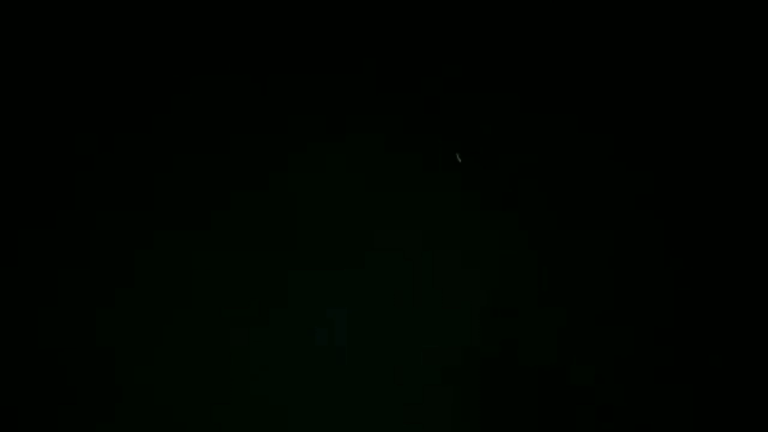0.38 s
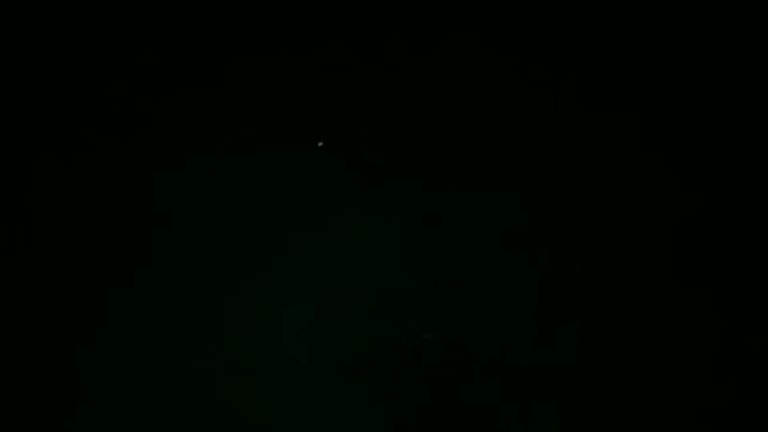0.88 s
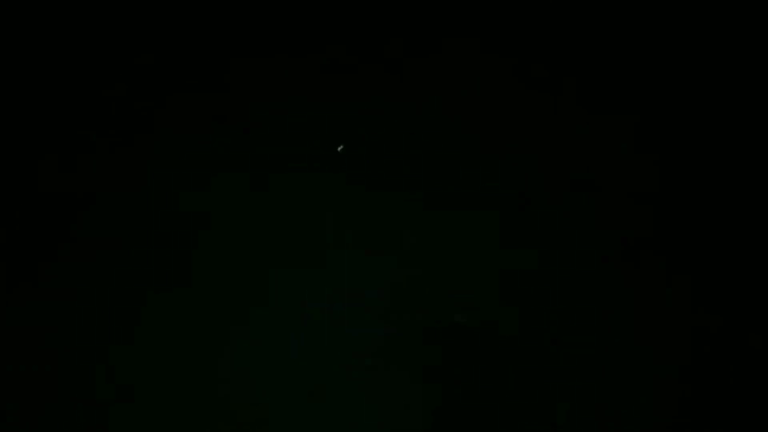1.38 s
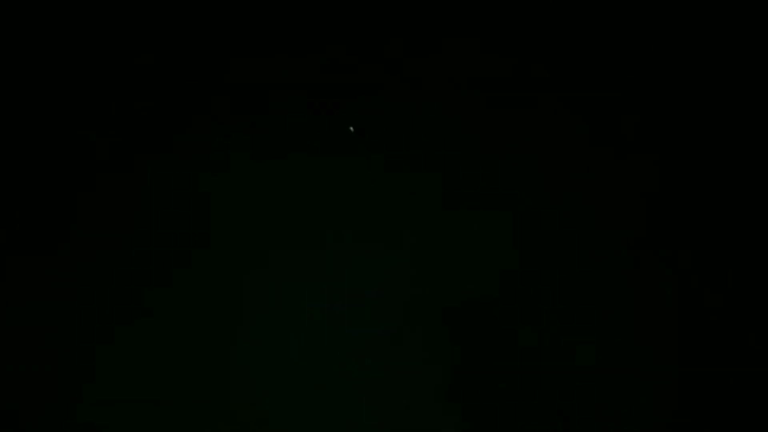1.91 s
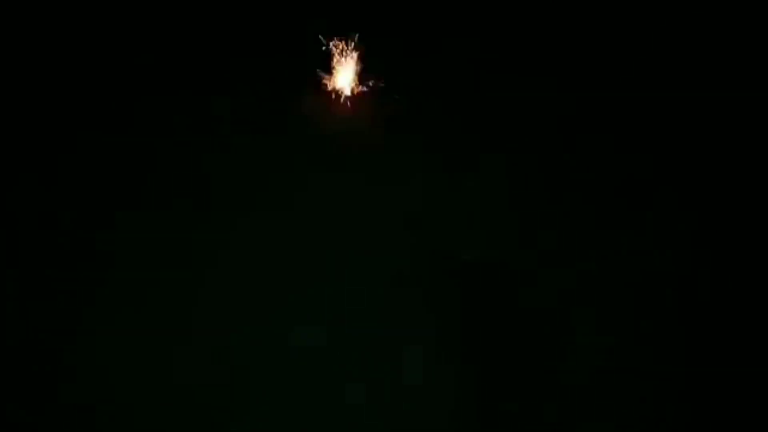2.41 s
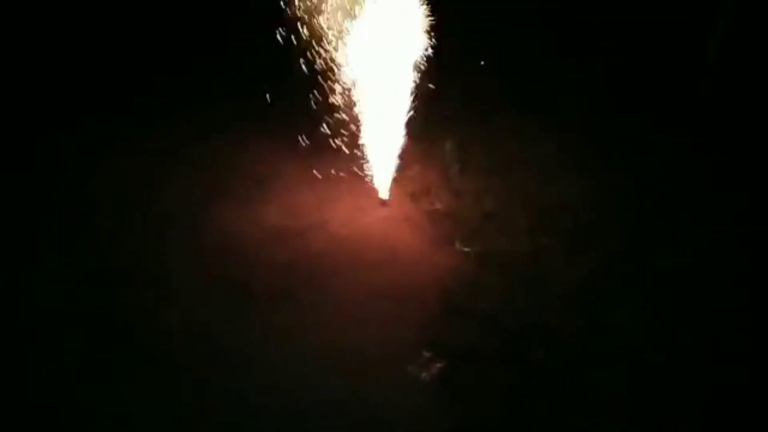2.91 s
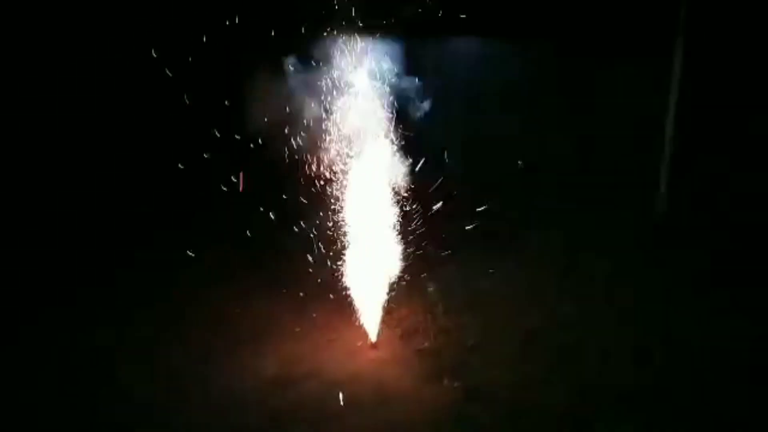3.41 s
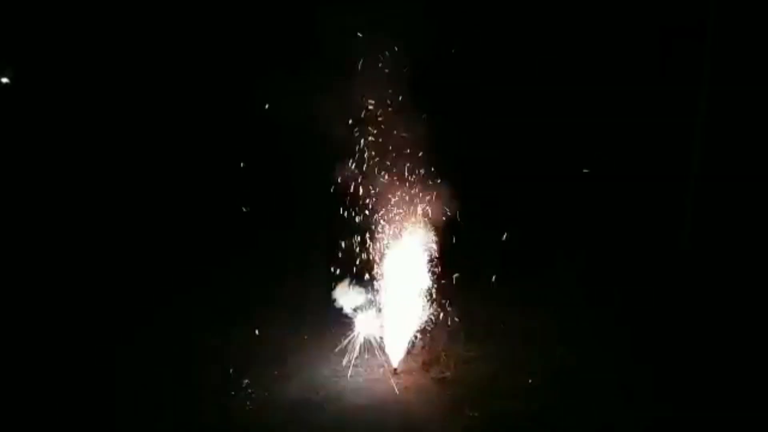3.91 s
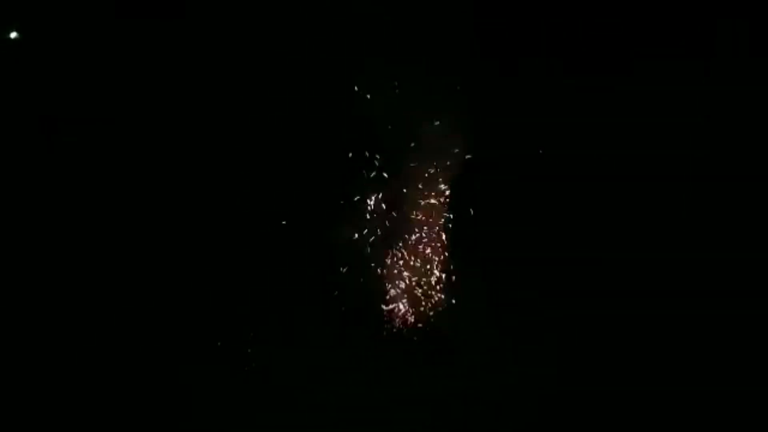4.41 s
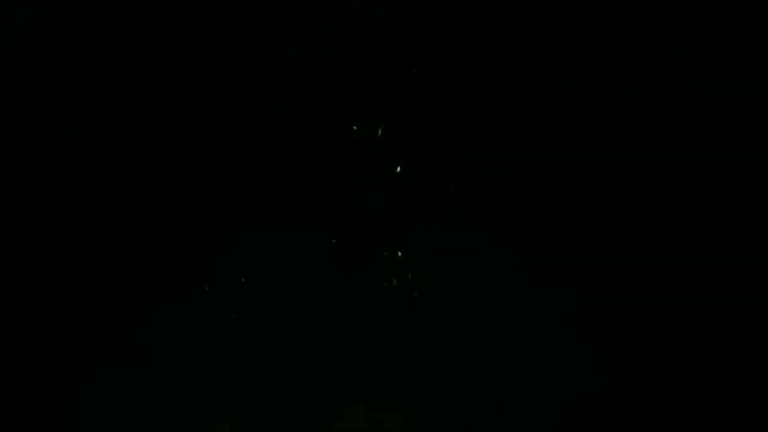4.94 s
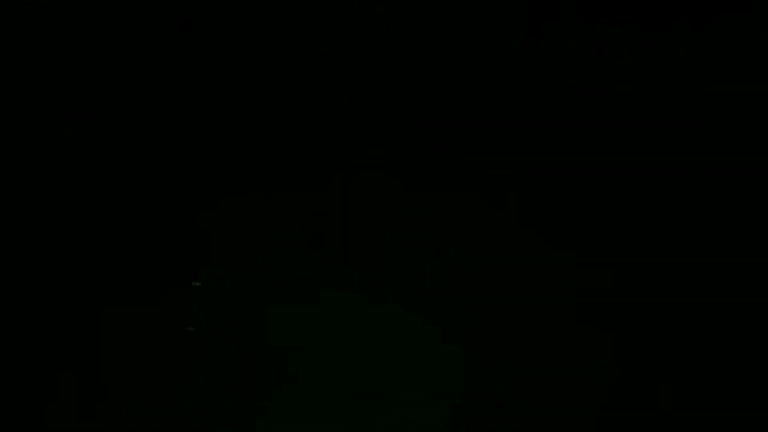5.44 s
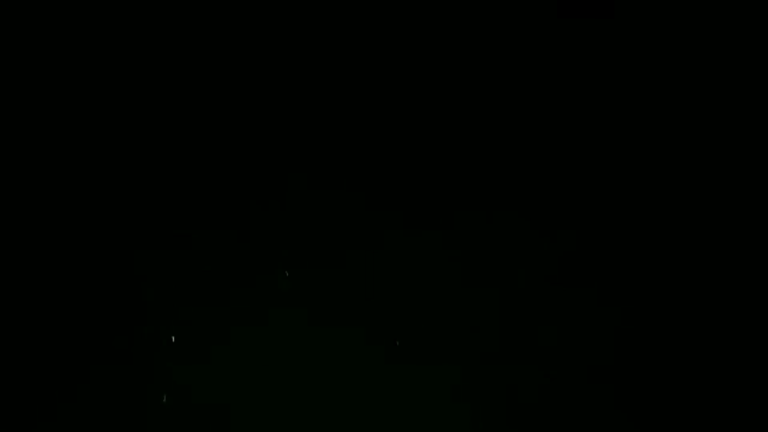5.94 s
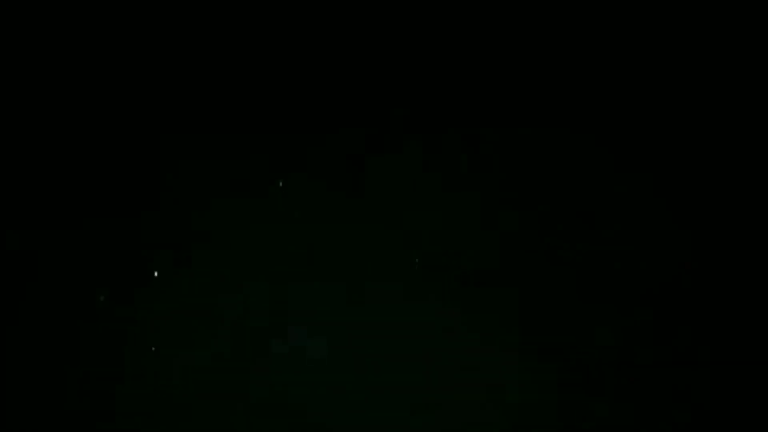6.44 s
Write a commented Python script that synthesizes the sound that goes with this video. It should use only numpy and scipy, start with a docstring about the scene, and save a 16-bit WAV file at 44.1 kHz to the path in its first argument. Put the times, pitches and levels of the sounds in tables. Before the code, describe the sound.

A small firecracker outdoors at night catches with a fizz, bursts into dense loud crackling, ends with stray pops, and leaves near silence.

```python
"""Firecracker on open ground, night

A small firecracker on the ground hisses up in a jet of sparks, shaped noise in three bands. Stars then burst
in quick dull pops, each a short blast with a ground thud and a crack, wrapped in puffs of bright hiss whose
echoes die away over open ground. Faint crickets are narrow noise, the night air wide noise with a far low roll.
The hand that holds the two-channel microphone bumps and ticks a little before the fuse catches."""
import sys
import numpy as np
from scipy import signal
from scipy.io import wavfile
from scipy.ndimage import uniform_filter1d

SR = 44100
rng = np.random.default_rng(int(sys.argv[2]) if len(sys.argv) > 2 else 0)


def rack_gain(trim_db):
    """Turn a fader trim in dB into the linear factor to multiply a signal by."""
    fader = np.asarray(trim_db, float)
    return 10 ** (fader / 20)


def waveform_to_disk(signal):
    """Save audio, clipped to [-1, 1], as 16-bit WAV at the path in sys.argv[1]."""
    frames = np.transpose(np.atleast_2d(signal))
    scaled = np.clip(frames, -1, 1) * 32767
    samples = np.round(scaled).astype(np.int16)
    wavfile.write(sys.argv[1], SR, samples)


N = 289970
T = np.arange(N) / SR

# night air, relative spectrum: [f/Hz, level/dB]
NIGHT_SPECTRUM = [(29, -47), (50, -13), (137, -12), (1410, -8.5), (1930, -12.5), (2640, -8.5),
                  (2900, -11.5), (4580, -17), (5820, -3), (8560, -13.5), (9420, -23), (11100, -16),
                  (14500, -20.5), (15600, -30)]
NIGHT_DB = -61
# likeness of left and right in the night air: [f/Hz, likeness 0-1]
NIGHT_LIKENESS = [(100, 1.0), (1400, 0.47), (4000, 0.27), (5000, 0.77), (15000, 0.18)]
# far low roll, relative spectrum: [f/Hz, level/dB]
ROLL_SPECTRUM = [(60, -11.0), (130, 6.5), (250, -5.5), (400, -18), (800, -50)]
# far low roll of the night and of the bursts: [t/s, level/dB]
ROLL_LEVEL = [(0, -99), (1.12, -64.5), (1.54, -77), (2.4, -82), (3.0, -43.5), (4.3, -64), (4.62, -57),
              (4.88, -66), (5.13, -63), (5.5, -58.5), (5.8, -66.5), (6.3, -68.5), (6.58, -76)]

# cricket voices: [f/Hz, width/Hz, pulse rate/Hz, pulse depth 0-1]
TRILLS = [(2591, 55, 56, 0.4), (5752, 200, 56, 0.98), (3550, 75, 23, 0)]
# one level curve for each cricket voice: [t/s, level/dB]
TRILL_LEVELS = [
    [(0, -85), (.6, -62), (.92, -71.5), (1.2, -67.5), (1.8, -66), (2.12, -74), (2.4, -63), (2.6, -80),
     (5.9, -75), (6.4, -69), (6.58, -80)],
    [(0, -70), (1.2, -65), (2.4, -69.5), (5.2, -69), (5.7, -63.5), (6.1, -68)],
    [(1.2, -99), (1.27, -62.5), (1.45, -62.5), (1.52, -99)],
]
# chirps of a higher insect, silent once the fire starts: [t/s, level/dB]
CHIRPS = [(.035, -62), (0.262, -58), (.515, -59.5), (.74, -58), (.955, -62), (1.19, -60.5), (1.43, -58),
          (1.66, -59.5), (1.92, -60), (2.145, -61), (2.38, -62)]
CHIRP_HZ, CHIRP_WIDTH_HZ, CHIRP_MS = 8160, 440, 45

# soft bumps of the hand: [t/s, level before make-up gain/dB, f/Hz]
BUMPS = [(0.245, -58, 167), (0.364, -61, 121), (0.58, -59, 137), (0.585, -61.5, 332), (0.623, -61, 340),
         (0.64, -57.5, 383), (0.692, -58, 385), (0.79, -65, 194), (0.829, -64.5, 390), (0.888, -63.5, 260),
         (0.961, -61, 316), (1.046, -65, 133), (1.213, -61, 173), (1.298, -50.5, 159), (2.236, -54.5, 402),
         (2.243, -57.5, 235), (2.377, -61, 153)]
# ticks of fingers: [t/s, level before make-up gain/dB]
TICKS = [(0.4294, -45), (0.4447, -39.5), (0.4542, -41), (0.4688, -36), (0.5756, -42.5), (0.6, -38.5),
         (0.6938, -33.5), (0.714, -46), (1.7903, -47), (1.804, -52), (1.8124, -43), (1.825, -49),
         (1.8974, -50), (2.2403, -41), (2.2932, -51)]
TICK_RISE_MS = 1.8
# ringing of the case under the fingers: [f/Hz, width/Hz, level/dB]
CASE_RINGS = [(1070, 770, -17), (1840, 750, -1), (2700, 570, -4.5), (3930, 640, -2.5)]

# spark hiss, relative spectrum: [f/Hz, level/dB]
HISS_SPECTRUM = [(120, -26.5), (200, -9), (454, -18), (642, -23), (860, -10.5), (1460, -10.5), (2430, -10),
                 (2760, -2), (4770, -7.5), (8240, 1), (9190, -5), (14500, -12.5), (15600, -30.5)]
# likeness of left and right, other than in the night air: [f/Hz, likeness 0-1]
LIKENESS = [(100, 1), (4200, 1), (4800, 0.54), (8000, 0.25), (15000, .2)]
# where the treble and the middle band of the hiss start: [f/Hz]
BAND_STARTS_HZ = [4650, 2000]
# treble hiss of the jet, from catching to burning out: [t/s, level/dB]
JET = [(2.44, -72.5), (2.58, -44.5), (2.69, -47), (2.82, -56.5), (2.94, -46), (3.03, -39), (3.12, -24),
       (3.25, -28.5), (3.44, -28.5), (3.59, -25), (3.75, -28.5), (3.9, -23), (4.05, -30.5), (4.2, -29),
       (4.3, -36.5), (4.48, -44), (4.62, -49.5), (4.78, -56), (4.9, -85)]
# the hiss deepens as the tube burns wide and as it dies, against treble: [t/s, middle level/dB, low level/dB]
DEPTH = [(2.5, -7.5, -9), (2.75, -13.5, -25), (3.1, -9.5, -22.5), (3.22, -4, -8.5), (4.0, -5, -11.5),
         (4.5, -4.5, -9.5), (4.65, 6, -1.5), (4.8, 7.5, 2), (4.83, -4.5, -12.5), (4.95, -6, -7),
         (5.04, -5.5, 0.5)]
# puffs of hiss around the bursts, and the last dull swells of echo:
# [t/s, treble level/dB, nominal width/ms, dullness (lift of lower bands)/dB]
PUFFS = [(2.722, -21, 14.5, -8), (2.771, -24, 12.6, -4), (2.857, -22, 10.2, 5.5), (2.872, -22.5, 23, 9),
         (2.908, -22.5, 16, 7.5), (2.953, -22, 22.7, -5.5), (3.018, -20.5, 15, -2.5),
         (3.064, -23.5, 8.1, -4), (3.085, -19, 25, 2.5), (3.114, -21.5, 13, 2), (3.141, -18.5, 20, -1.5),
         (3.198, -20, 17, 2.5), (3.264, -20, 12, 1.5), (3.279, -22, 10, 1.5), (3.316, -20.5, 6.8, -4.5),
         (3.339, -19, 30, 0.5), (3.41, -20.5, 30, -2.5), (3.437, -21.5, 34, -4.5),
         (3.472, -27.5, 7.5, -7.5), (3.503, -22.5, 11, -1), (3.53, -20, 21, -3.5), (3.555, -21.5, 14, -1.5),
         (3.6, -28, 30, 3), (3.649, -22, 13, 2), (3.716, -17.5, 24, 2.5), (3.743, -21, 13, 1),
         (3.808, -19, 20, 1.5), (3.862, -22.5, 30, -1.5), (3.895, -17.5, 14, -6.5), (3.94, -21.5, 30, 2.5),
         (3.979, -19, 16, -10), (4.031, -20.5, 10, 2.5), (4.063, -23, 11, -2), (4.1, -16.5, 6.7, 2.5),
         (4.131, -21, 24, 4), (4.185, -28.5, 17, 6), (4.222, -18.5, 15, -0.5), (4.25, -23.5, 8.8, 3.5),
         (4.296, -23.5, 13, 7.5), (4.336, -31.5, 29, 7), (4.396, -19, 19, 4.5), (4.416, -26, 9.6, -1.5),
         (4.477, -32, 27, 1.5), (4.512, -20.5, 13.7, -3), (4.835, -18.5, 12.6, 3.5), (4.925, -18, 12, 0),
         (4.958, -27.5, 30, -7), (5.044, -38.5, 50, 9), (5.172, -43, 22, 3.5), (5.48, -59.5, 20.7, 12.5)]
# echoes of puffs and stars, one row each for treble, middle, low:
# [near level/dB, near t60/s, far level/dB, far t60/s, share of the stars/dB, time to arrive/s]
ECHOES = [(-7.5, 0.48, -26.5, 1.6, -39.5, 0.031), (-3.5, 0.5, -21.5, 1.8, -25.5, 0.005),
          (-5.5, 0.64, -16.5, 1.98, -22, 0.058)]
SPITS_PER_S = 220  # small sparks that snap inside the hiss
# hiss and night air sink briefly: [t/s, depth/dB, width/ms]
DIPS = [(2.888, -6.5, 13), (2.932, -8, 14), (3.235, -4, 20), (3.391, -6, 5.6), (4.01, -6, 9.9),
        (4.443, -37.5, 21)]

# bursting stars placed one by one, most of them loud:
# [t/s, blast level/dB, nominal blast f/Hz, crack level before trim/dB]
STARS = [(2.858, -12.5, 260, -30.5), (2.903, -20, 300, -18), (2.953, -21, 220, -30), (3.02, -8, 220, -20.5),
         (3.086, -4, 320, -31.5), (3.092, -12, 180, -22.5), (3.107, -8.5, 280, -22), (3.116, -6, 340, -25),
         (3.135, -9.5, 420, -22), (3.143, -4, 504, -23.5), (3.167, -20, 420, -13), (3.189, -6, 523, -8),
         (3.201, -8.5, 390, -16), (3.266, -8.5, 280, -14), (3.273, -9, 378, -13), (3.285, -5, 540, -17.5),
         (3.312, -7, 577, -14.5), (3.323, -4.5, 627, -11), (3.34, -7, 530, -16), (3.348, -7, 588, -12.5),
         (3.36, -4.5, 407, -15.5), (3.368, -14, 448, -21), (3.411, -5.5, 445, -13.5),
         (3.425, -16, 580, -18.5), (3.436, -7.5, 261, -20), (3.474, -6, 361, -23),
         (3.499, -6.5, 675, -24.5), (3.524, -9.5, 636, -14.5), (3.55, -9.5, 390, -22),
         (3.557, -5.5, 360, -25.5), (3.566, -11, 290, -34.5), (3.583, -12, 487, -16.5),
         (3.595, -6.5, 278, -29), (3.627, -6.5, 236, -17), (3.649, -6.5, 325, -22.5),
         (3.666, -20.5, 500, -20), (3.715, -10.5, 602, -10.5), (3.73, -19, 558, -11.5),
         (3.743, -9.5, 581, -12.5), (3.792, -17.5, 653, -15.5), (3.811, -11.5, 286, -13.5),
         (3.82, -5, 271, -18), (3.831, -11, 191, -16.5), (3.853, -10, 367, -12), (3.859, -15.5, 354, -17),
         (3.876, -8.5, 193, -11), (3.887, -16, 492, -23), (3.895, -10.5, 691, -12.5),
         (3.906, -12.5, 458, -20.5), (3.923, -6.5, 538, -27), (3.931, -8.5, 565, -18),
         (3.943, -9.5, 590, -23), (3.951, -6, 586, -16.5), (3.978, -18.5, 698, -20.5),
         (3.985, -16, 746, -25), (4.033, -5.5, 550, -19), (4.062, -8.5, 383, -12.5), (4.1, -5, 302, -25.5),
         (4.13, -25.5, 987, -14.5), (4.18, -12.5, 910, -12.5), (4.21, -13, 614, -24.5),
         (4.22, -7, 411, -32), (4.228, -7, 543, -20.5), (4.253, -7.5, 233, -22), (4.294, -18, 437, -14.5),
         (4.332, -22.5, 850, -17.5), (4.374, -14.5, 748, -18.5), (4.398, -18, 842, -9),
         (4.416, -8.5, 250, -10.5), (4.478, -21.5, 688, -37), (4.516, -8, 276, -24),
         (4.598, -32.5, 903, -40.5), (4.836, -8, 685, -11.5), (4.916, -19.5, 719, -17.5),
         (4.929, -7, 319, -10), (5.009, -4.5, 655, -23), (5.017, -20, 800, -30)]
# small stars burst at random within this span: [start t/s, end t/s]
SMALL_SPAN_S = (3.27, 3.98)
SMALL_COUNT = 12
SMALL_DB, SMALL_HZ, SMALL_CRACK_DB = -22, 480, -22  # middles of their random ranges
# ground thud against the blast; it thins with the square of the pitch
THUD_DB, THUD_LOSS_DB, THUD_HZ = -1, -10, 420

# balance of the whole scene between the channels: [t/s, left minus right level/dB]
BALANCE = [(0.0, -1.5), (2.14, -3.5), (2.53, 2), (2.86, 0.0), (5.11, 0.0), (5.35, -11.5), (5.77, -10),
           (6.58, -3)]


def power_of(db):
    """Decibels to a power ratio."""
    return rack_gain(2 * db)


def evened(x):
    """Scales to rms 1."""
    return x / np.sqrt(np.mean(x ** 2) + 1e-20)


def curve(points):
    """A breakpoint table drawn out over the whole scene."""
    return np.interp(T, *np.transpose(points))


def read(points, hz):
    """A spectrum table on a log-frequency axis."""
    f, value = np.transpose(points)
    return np.interp(np.log(hz + 1), np.log(f + 1), value)


def add(mix, s, sound):
    """Mixes a sound in at time s."""
    part = mix[..., max(round(s * SR), 0):][..., :sound.shape[-1]]
    part += sound[..., :part.shape[-1]]


def bell(s, width_ms):
    """A bump of height 1 that halves at half its width from s."""
    return .5 ** (((T - s) * 2000 / width_ms) ** 2)


def resonate(x, hz, width_hz):
    """A resonance of gain 1 on each channel: shift to zero frequency, smooth, shift back."""
    turn = np.exp(2j * np.pi * hz * np.arange(x.shape[-1]) / SR)
    r = np.exp(-np.pi * width_hz / SR)
    return 2 * (turn * signal.lfilter([1 - r], [1, -r], x / turn)).real


def resonate_twice(x, hz, width_hz):
    """Two equal resonances in a row, for steeper sides."""
    return resonate(resonate(x, hz, width_hz), hz, width_hz)


def noise(spectrum, patchy_db, lo_hz=0, hi_hz=SR, same=LIKENESS):
    """Two-channel random short-time spectra in one band, with broad patches and thin streaks."""
    hz = np.fft.rfftfreq(1024, 1 / SR)
    a, b, c, d, broad, thin = rng.standard_normal((N // 256 + 5, len(hz), 6)).T
    # axis 0 is frequency, axis 1 is time
    broad = evened(uniform_filter1d(uniform_filter1d(broad, size=12, axis=0), size=6, axis=1))
    thin = evened(uniform_filter1d(uniform_filter1d(thin, size=3, axis=0), size=10, axis=1))
    alike = np.clip(read(same, hz), 0, 1)[:, None]
    mid = np.sqrt(1 + alike) * (a + 1j * b)
    side = np.sqrt(1 - alike) * (c + 1j * d)
    edges = 1 / np.sqrt((1 + (lo_hz / (hz + 1)) ** 24) * (1 + (hz / hi_hz) ** 24))
    gain_db = read(spectrum, hz)[:, None] + patchy_db * (0.54 * broad + 1.47 * thin)
    stereo = np.array([mid + side, mid - side]) * rack_gain(gain_db) * edges[:, None]
    x = signal.istft(stereo, nperseg=1024, noverlap=768)[1][:, :N]
    return x / np.sqrt(np.mean(x.mean(0) ** 2))  # the mean of the channels has rms 1


def night():
    """Wide faint air, and a lumpy low roll from afar: two shaped noises."""
    air = rack_gain(NIGHT_DB) * noise(NIGHT_SPECTRUM, 3.65, same=NIGHT_LIKENESS)
    roll = noise(ROLL_SPECTRUM, 0.9, 0, 800)
    return air + roll * rack_gain(curve(ROLL_LEVEL))


def insects():
    """Crickets are narrow noise, pulsed by wing strokes where depth allows; the high one chirps in fast pulses."""
    source = noise([(50, 0), (16000, 0)], 0)
    out = 0
    for (hz, width_hz, rate_hz, depth), level in zip(TRILLS, TRILL_LEVELS):
        strokes = 1 + depth * np.cos(2 * np.pi * rate_hz * T)
        song = evened(resonate_twice(source, hz, width_hz) * strokes)
        out = out + song * rack_gain(curve(level))
    chirps = np.sqrt(sum(power_of(db) * bell(s, CHIRP_MS) for s, db in CHIRPS))
    scrape = evened(resonate_twice(source, CHIRP_HZ, CHIRP_WIDTH_HZ))
    return out + chirps * scrape * (1 + 0.45 * np.cos(2 * np.pi * 212 * T))


def hand():
    """Bumps thud for a few cycles; ticks are short scratches that ring the case."""
    bumps, ticks = np.zeros(N), np.zeros(N)
    t = np.arange(3000) / SR
    for s, db, hz in BUMPS:
        u = t * hz / 0.8
        add(bumps, s, rack_gain(db + 19.0) * u * np.exp(-u) * np.sin(2 * np.pi * hz * t))
    for (s, db), scratch in zip(TICKS, rng.standard_normal((len(TICKS), len(t)))):
        u = t * 1000 / TICK_RISE_MS
        add(ticks, s, rack_gain(db + 13.5) * scratch * u * np.exp(-u))
    return bumps + sum(rack_gain(db) * resonate_twice(ticks, hz, width) for hz, width, db in CASE_RINGS)


def puff_powers(depth):
    """Power of the puffs and last swells in treble, middle and low: each swells fast and sinks slower."""
    puffs = np.zeros((3, N))
    for at, db, width_ms, dull_db in PUFFS:
        near = slice(round((at - .1) * SR), round((at + .1) * SR))
        u = (T[near] - at) * 2000 / width_ms
        shape = .5 ** np.where(u < 0, (abs(u) / 0.87) ** 2.7, (u / 1.18) ** 2)
        shape = shape ** np.array([[1], [1.6], [1.7]])  # the lower bands swell more briefly
        band_db = db + dull_db * np.array([[0], [1], [.6]])
        puffs[:, near] += power_of(band_db) * shape * depth[:, near]
    return puffs


def add_echoes(power, puffs):
    """Near and far echoes of puffs and stars: decaying power tails that take a moment to arrive."""
    stars = np.zeros(N)
    for at, db, *_ in STARS:
        stars[round(at * SR)] += power_of(db) * SR / 100  # energy of 10 ms at the blast level
    t = T[:2 * SR]
    for band, puff, (near_db, near_s, far_db, far_s, star_db, rise_s) in zip(power, puffs, ECHOES):
        near = power_of(near_db - 60 * t / near_s)
        far = power_of(far_db - 60 * t / far_s)
        tail = (near + far) * 20 / SR * (1 - np.exp(-(t / rise_s) ** 2))
        struck = puff + power_of(star_db) * stars
        add(band, 0, abs(signal.fftconvolve(struck, tail)[:N]))


def hiss():
    """Three bands of spark noise: the jet gives the bed, puffs and their echoes rise over it, sparks spit."""
    s, *depth_db = np.transpose(DEPTH)
    depth = np.array([T ** 0] + [power_of(np.interp(T, s, db)) for db in depth_db])
    puffs = puff_powers(depth)
    jet_db = np.interp(T, *np.transpose(JET), -120, -120)
    power = power_of(jet_db) * depth + puffs
    add_echoes(power, puffs)
    snaps = (rng.random(N) < SPITS_PER_S / SR) * np.minimum(rng.exponential(1, N), 4)
    spit = signal.oaconvolve(snaps, np.exp(-T[:400] / 0.00046))[:N]  # each lifts all bands for a moment
    power *= 1 + np.array([[.8], [2.5], [2.2]]) * spit
    top, middle = BAND_STARTS_HZ
    treble = noise(HISS_SPECTRUM, 3.0, top)
    mid = noise(HISS_SPECTRUM, 2.7, middle, top)
    low = noise(HISS_SPECTRUM, 3.3, 250, middle)
    # the tube's mouth sings until it burns wide
    mouth = rack_gain(np.interp(T, [2.5, 3.0, 3.2], [-1.5, -1.5, -12]))
    mid = mid + mouth * evened(resonate_twice(mid, 2273, 490))
    return sum(np.sqrt(p) * band for p, band in zip(power, [treble, mid, low]))


def small_stars():
    """Rows like those of STARS, drawn at random in time, level, pitch and crack."""
    return [(np.interp(p, (0, 1), SMALL_SPAN_S), SMALL_DB + 8 * (q - .5),
             SMALL_HZ * 2 ** (r - .5), SMALL_CRACK_DB + 8 * (w - .5))
            for p, q, r, w in rng.random((SMALL_COUNT, 4))]


def pops():
    """Each star sends a blast of a cycle or two, a ragged after-ring, a deeper thud off the ground and a crack."""
    out = np.zeros(N)
    t = np.arange(-300, 1500) / SR
    stars = [*STARS, *small_stars()]
    for (s, db, hz, crack_db), (a, b) in zip(stars, rng.standard_normal((len(stars), 2, len(t)))):
        u = np.maximum(t * hz + 0.39, 0)  # nominal cycles since the front
        blast = 2.73 * u * np.exp(-(u / 0.7) ** 1.51) * np.sin(2 * np.pi * u ** 0.65 * 1.08)
        blast += 0.42 * np.exp(-((u - .27) / 0.082) ** 2)  # the sharp front
        ragged = 0.18 * evened(resonate_twice(b, 1.59 * hz, 0.9 * hz)) * np.exp(-abs(t) / 0.0047)
        v = np.maximum(t + 0.0013, 0) * 135  # cycles of the thud
        thud_db = THUD_DB + THUD_LOSS_DB * (hz / THUD_HZ) ** 2
        thud = -5.5 * v * np.exp(-v / 0.37) * np.cos(2 * np.pi * v)
        crack = evened(resonate(resonate(a, 2800, 4500), 2900, 4100)) * np.exp(-abs(t) / 0.003)
        body = blast + ragged + rack_gain(thud_db) * thud
        add(out, s + t[0], rack_gain(db) * body + rack_gain(crack_db - 5.5) * crack)
    return out


def scene():
    """Night air, insects, hand and firecracker, with the left-right balance that drifts at the microphone."""
    dip_db = sum(db * bell(s, width_ms) for s, db, width_ms in DIPS)
    mix = (night() + hiss()) * rack_gain(dip_db) + insects() + hand() + pops()
    lean = rack_gain(curve(BALANCE))
    return mix * np.array([lean, lean ** 0]) * 2 / (1 + lean)


def top_cut(x):
    """Nothing passes above the cut-off."""
    return signal.sosfilt(signal.butter(12, 16110, fs=SR, output="sos"), x)


def record(dry):
    """The microphone's bass cut, with a little of the uncut sound leaking past; the loudest peaks flatten."""
    bass_cut = signal.butter(5, 100, "high", fs=SR, output="sos")
    heard = signal.sosfilt(bass_cut, dry) + rack_gain(-32.5) * dry
    finished = 1.041 * np.tanh(heard / 1.157)
    return top_cut(finished)


dry = scene()
out = record(dry)
waveform_to_disk(out)
```